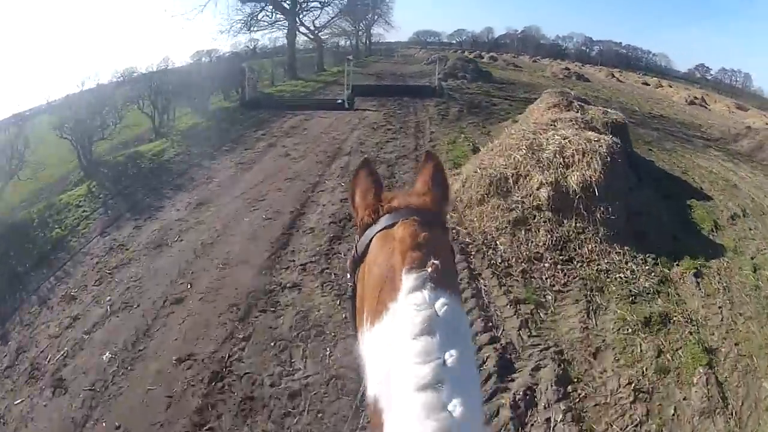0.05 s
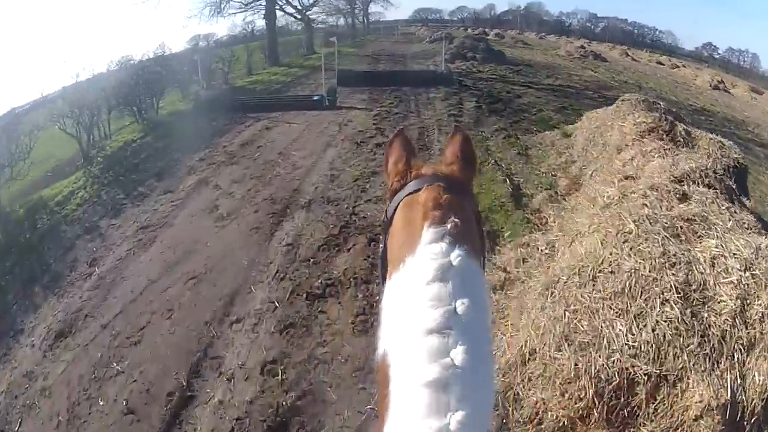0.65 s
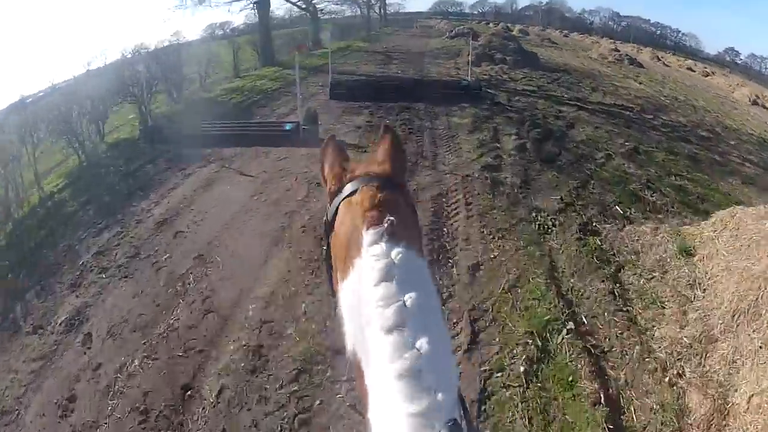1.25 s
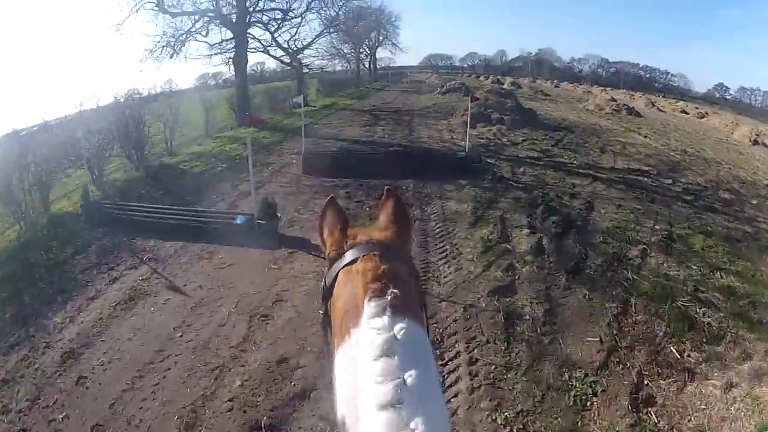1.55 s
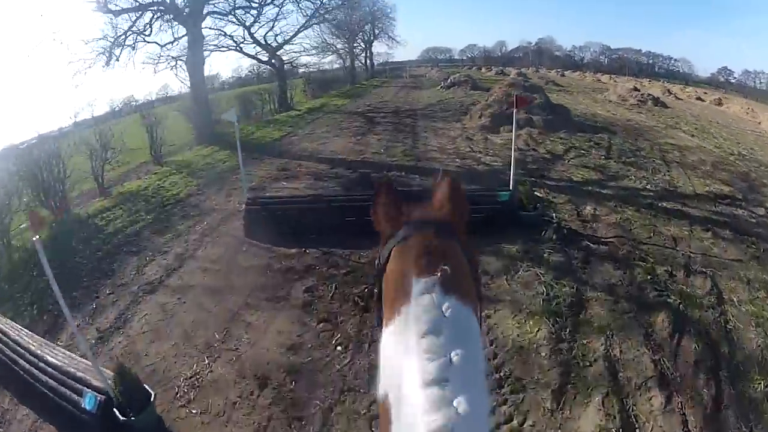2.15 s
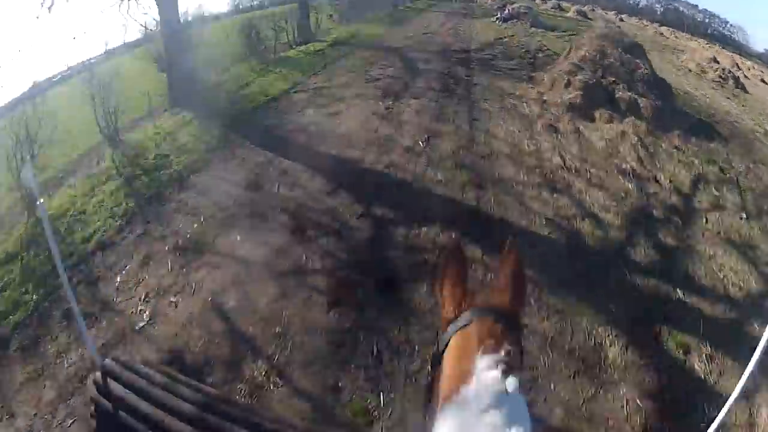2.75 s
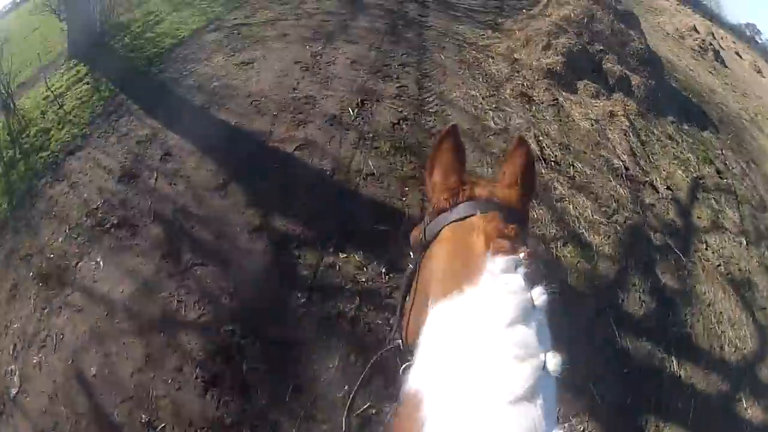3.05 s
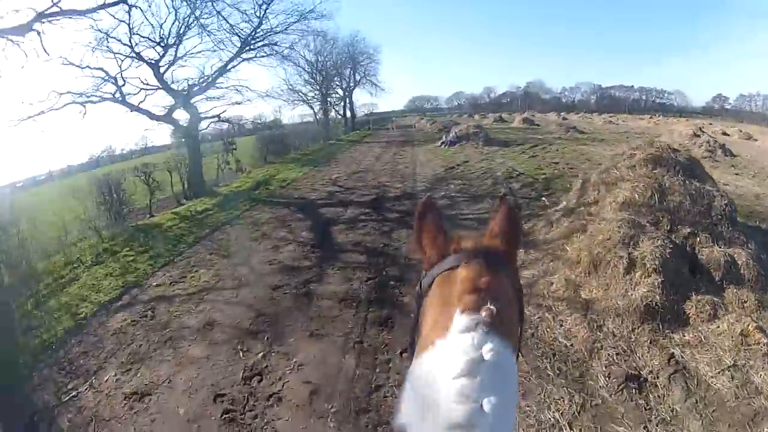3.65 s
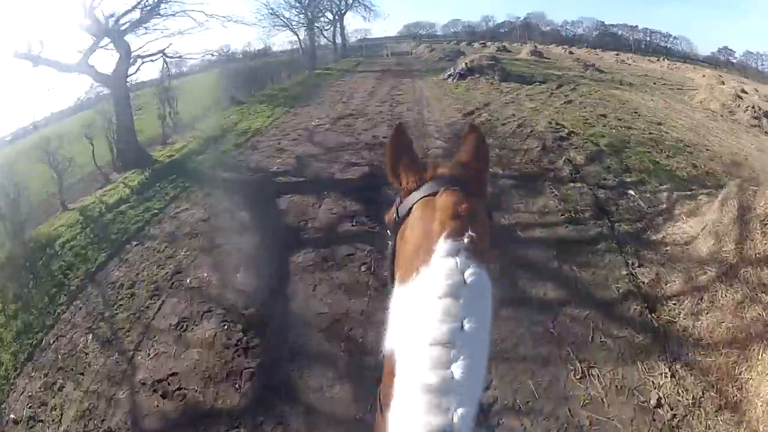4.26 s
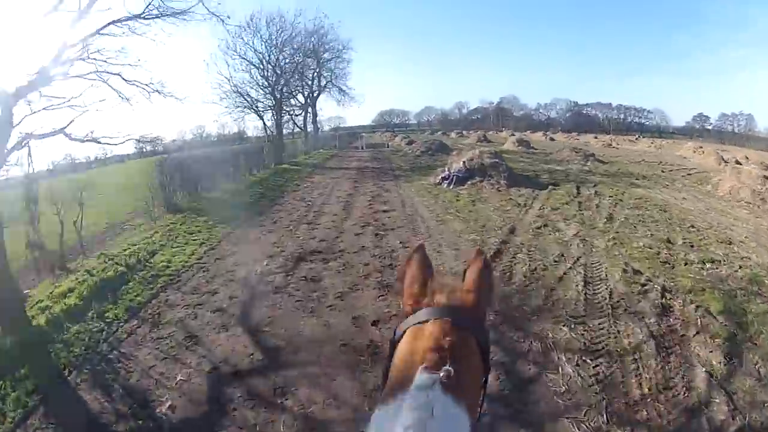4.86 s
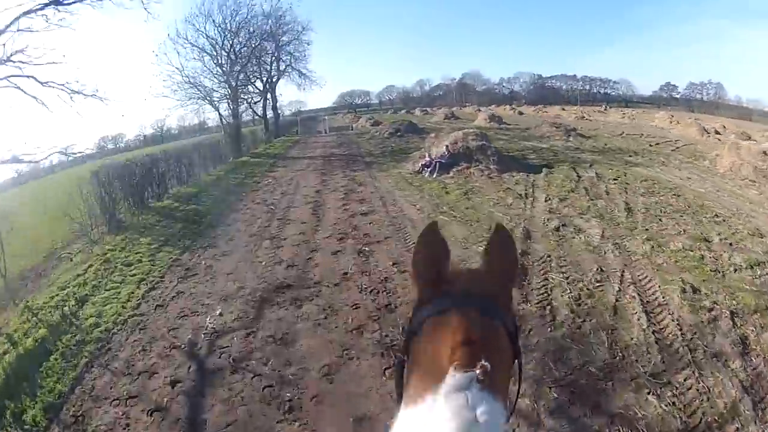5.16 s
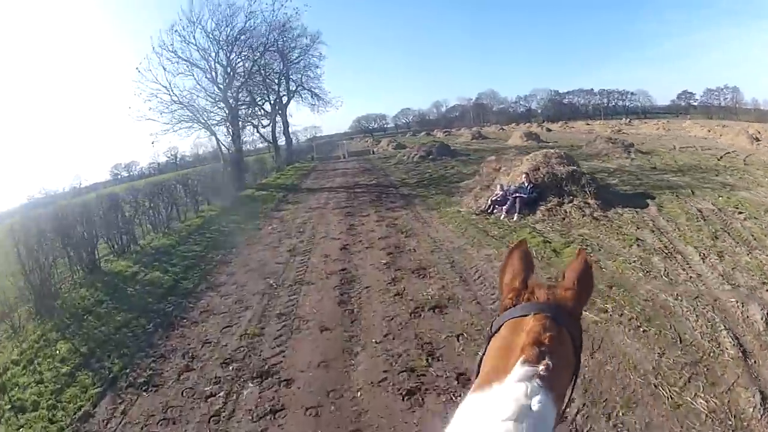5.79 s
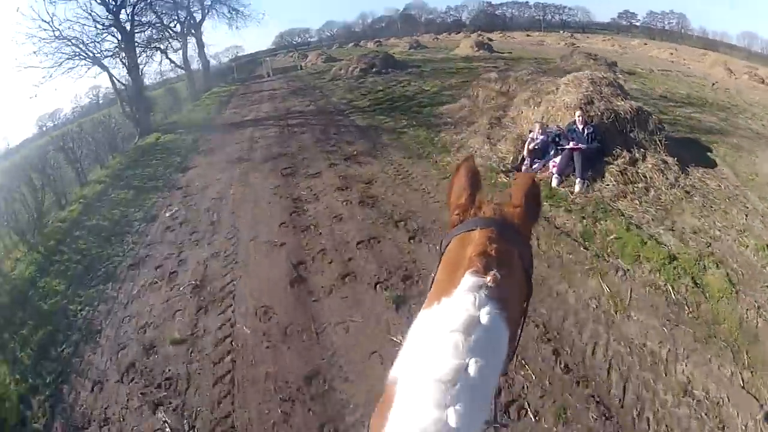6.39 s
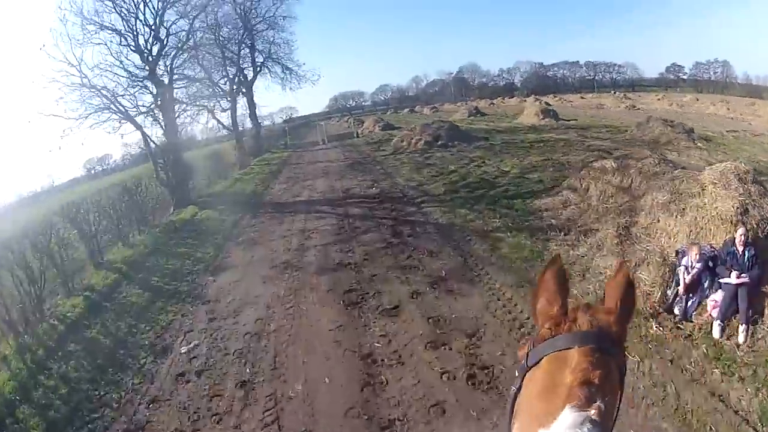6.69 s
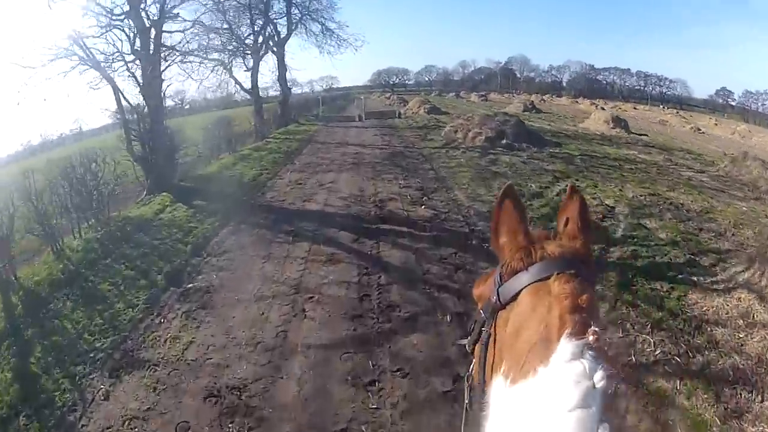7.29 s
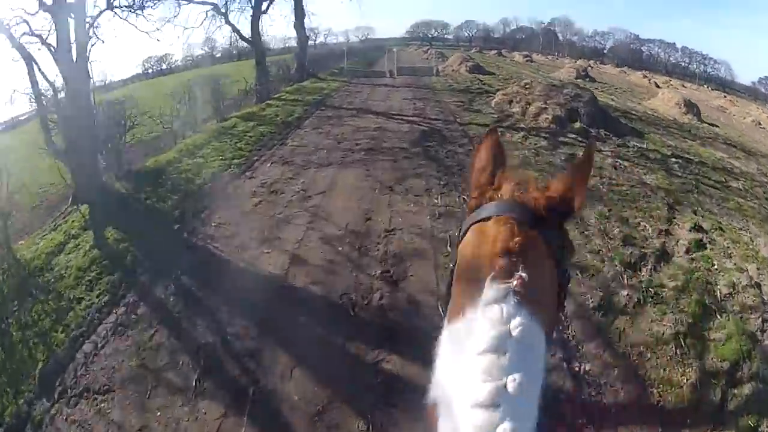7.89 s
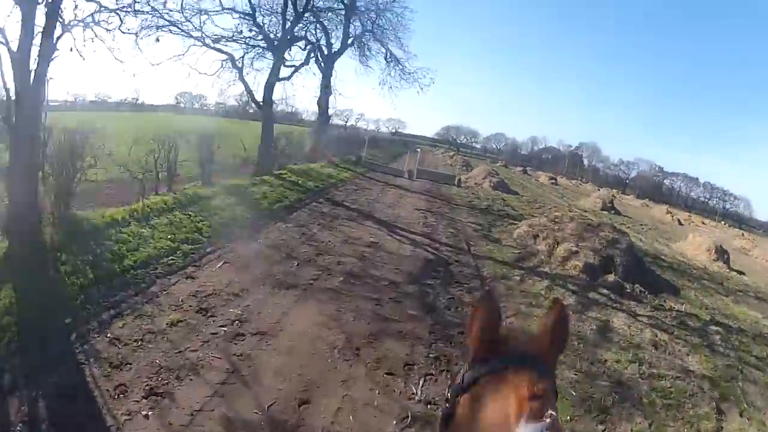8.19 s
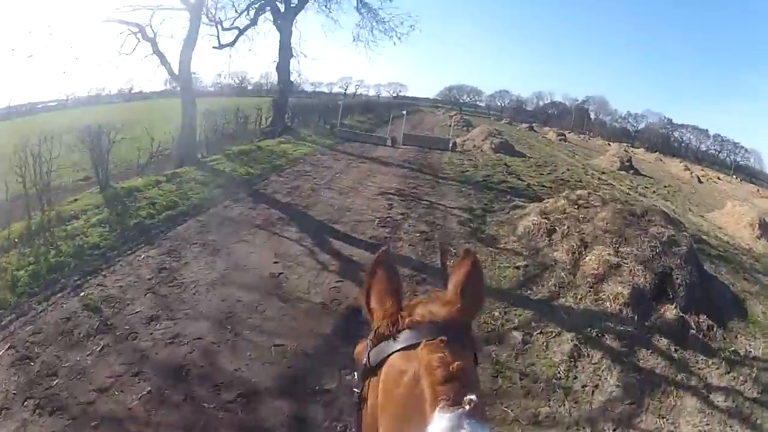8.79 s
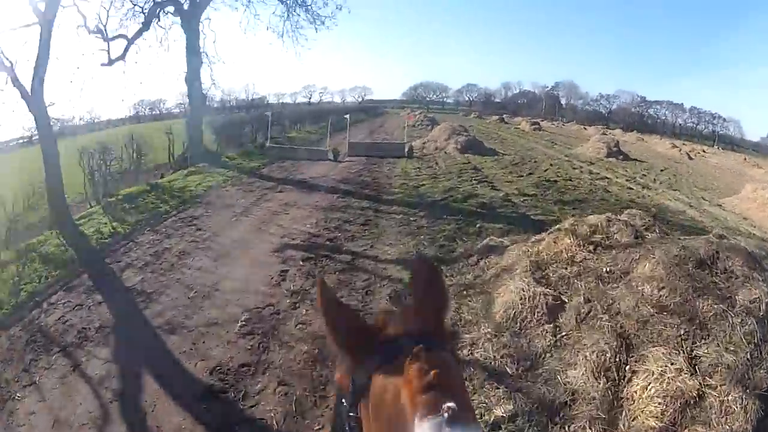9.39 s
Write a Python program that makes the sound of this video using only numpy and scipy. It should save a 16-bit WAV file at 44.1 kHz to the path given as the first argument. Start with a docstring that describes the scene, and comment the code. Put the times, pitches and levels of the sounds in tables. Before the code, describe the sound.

A horse canters on a dirt track, heard through a cased camera on the rider's helmet. Deep, muffled hoof thuds come roughly twice a second, with lighter footfalls between. Wind rumbles on the case throughout and hisses in surges with each stride. The camera knocks hollowly in its mount from about 1 second, and tack jingles faintly now and then. Between 2.8 and 3 seconds the horse jumps: the heaviest thuds arrive with a quick cluster of knocks, scrapes, tiny plastic squeaks and grit ticks. The hiss dips briefly, then the canter carries on. From about 4 seconds the knocks come more regularly, and the wind surges are stronger from around 5 seconds. A hard knock lands near 5.9 seconds and a sharp tick of grit near 6.5. Thuds, knocks and wind continue until the end at about 9.4 seconds, all boxy with a thin, glassy treble.

```python
"""A horse canters along a dirt track and jumps a low fence, its hoof blows coming up through the rider
as deep thuds in a cased camera on the helmet. The camera knocks and squeaks in its mount and scrapes
at the jump; tack jingles and flung grit ticks on the case. Wind buffets the case and hisses in surges
with the stride. The recorder's coarse sampling adds a glassy top."""
import sys
import numpy as np
from scipy import signal
from scipy.fft import rfft, irfft
from scipy.io import wavfile
from scipy.ndimage import uniform_filter1d

SR = 44100
rng = np.random.default_rng(int(sys.argv[2]) if len(sys.argv) > 2 else 0)


def wav_record(signal):
    """Record a signal, one row per channel, as 16-bit PCM in the file named by sys.argv[1]."""
    frames = np.transpose(np.atleast_2d(signal))
    bounded = np.clip(frames, -1, 1)
    # unit amplitude maps onto the largest positive 16-bit level
    quanta = np.round(bounded * 32767).astype(np.int16)
    wavfile.write(sys.argv[1], SR, quanta)


N = 416290
TIME = np.arange(N) / SR

# heavy hoof blows felt through the rider: start_s, level_db
HEAVY_BLOWS = [(0.753, -21), (1.295, -22.5), (1.742, -14), (1.954, -23.5), (2.253, -27), (2.83, -7),
               (2.913, -11), (2.984, -13), (3.445, -22), (3.749, -16), (4.255, -20.5), (4.346, -17),
               (4.448, -20), (4.883, -21.5), (5.354, -18), (5.883, -20.5), (6.462, -13.5), (6.973, -25.5),
               (7.501, -23), (7.985, -18), (8.117, -17.5), (8.214, -27), (8.576, -22), (9.098, -19),
               (9.167, -17.5)]
# each stride swings the rider forward into the air: crest_s, hold_s, hiss_db, sizzle_vs_hiss_db
STRIDES = [(0.038, 0.057, -50, -17.5), (0.495, 0.27, -55.5, -26.5), (1.182, 0.029, -52.5, -19.5),
           (1.666, 0.033, -49.5, -22), (2.145, 0.05, -52.5, -25), (2.68, 0.21, -48, -21),
           (3.166, 0.04, -64.5, -16), (3.496, 0.22, -58.5, -22), (4.155, 0.036, -48.5, -23),
           (4.691, 0.14, -47.5, -29), (5.246, 0.12, -42.5, -29), (5.745, 0.089, -43.5, -21),
           (6.234, 0.18, -46, -25.5), (6.836, 0.064, -44.5, -26), (7.288, 0.13, -48.5, -27),
           (7.768, 0.12, -58, -29), (8.304, 0.14, -48, -15.5), (8.82, 0.17, -45, -16.5),
           (9.363, 0.09, -47, -16.5)]
# the case's ring under light, sharp contacts: pitch_hz, level_db, t60_s
CASE_MODES = [(505, -30, 0.015), (670, -5, 0.038), (1134, 4, 0.02), (1770, 4.5, 0.021), (2220, 8, 0.0074),
              (2830, -5.5, 0.02), (3400, 0.5, 0.012), (3690, -7.5, 0.044), (5200, 4.5, 0.008)]


def undb(db):
    """Decibels to gain."""
    return 10 ** (np.asarray(db) / 20)


def unit(x):
    """Scale to rms 1."""
    return x / np.sqrt(np.mean(x ** 2))


def add(out, start_s, sound):
    """Mix a sound in at start_s."""
    i = max(int(start_s * SR), 0)
    out[i:i + len(sound)] += sound[:N - i]


def shaped_noise(spectrum):
    """Noise through an EQ curve of (hz, db) points, rolled off past both ends; rms 1."""
    hz, db = np.transpose(spectrum)
    bins_hz = np.maximum(np.fft.rfftfreq(N, 1 / SR), 1)
    rolloff = np.minimum(bins_hz / hz[0], 1) ** 2 * np.minimum(hz[-1] / bins_hz, 1) ** 2
    curve = undb(np.interp(np.log(bins_hz), np.log(hz), db))
    return unit(irfft(rfft(rng.standard_normal(N)) * rolloff * curve, N))


def wander(rate_hz):
    """Random steps, smoothed twice into a drift; rms 1."""
    step = max(int(SR / rate_hz), 1)
    held = np.repeat(rng.standard_normal(N // step + 1), step)
    return unit(uniform_filter1d(uniform_filter1d(held, step), step)[:N])


def grains(per_s, spread_db=3):
    """Random tiny contacts of uneven size; rms 1."""
    contacts = (rng.random(N) < per_s / SR) * rng.standard_normal(N)
    return unit(contacts * undb(spread_db * rng.standard_normal(N)))


def ring(modes, pitch=1, mode_ratio=1):
    """Struck, damped modes; a negative mode_ratio swings neighbours opposite ways, so the sound builds."""
    t = TIME[:SR // 8]
    return sum(mode_ratio ** k * undb(db) * np.sin(2 * np.pi * hz * pitch * t) * undb(-60 * t / t60_s)
               for k, (hz, db, t60_s) in enumerate(modes))


def resonate(contacts, modes):
    """Play contacts through a ringing body of unit energy."""
    body = ring(modes)
    return signal.fftconvolve(contacts, body / np.linalg.norm(body))[:N]


def airflow_db(rise_db_per_s=50.5, fall_db_per_s=116, lull_db=3, lull_after_s=0.084, lull_s=0.08):
    """Headwind that lulls as heavy blows check the rider, plus surges that collapse as the horse lands."""
    # steady airflow, following the horse's pace: time_s, hiss_db
    headwind = [(0, -58.5), (1.9, -60), (2.4, -64.5), (3.2, -63), (3.9, -65), (4.5, -56.5), (5, -58.5),
                (7.5, -51), (8.6, -55), (9.44, -55.5)]
    power = undb(np.interp(TIME, *np.transpose(headwind))) ** 2
    for start_s, _ in HEAVY_BLOWS:
        lull = np.exp(-((TIME - start_s - lull_after_s) / lull_s) ** 2)
        power *= undb(-lull_db * lull) ** 2
    for crest_s, hold_s, hiss_db, _ in STRIDES:
        before_db = rise_db_per_s * np.maximum(crest_s - TIME, 0)
        after_db = fall_db_per_s * np.maximum(TIME - crest_s - hold_s, 0)
        power += undb(hiss_db - before_db - after_db) ** 2
    return 10 * np.log10(power)


def wind(eddy_db=2.5, flutter_db=1.87):
    """Eddies buffet the case; in faster air the rush grows slowly, the hiss more, and a seam whistles."""
    # EQ curves of the five layers, low to high: frequency_hz, level_db
    buffet = [(15, 12), (30, 4), (70, 0.5), (120, -1), (170, 0), (260, -8.5), (380, -12.5), (500, -23),
              (700, -27.5)]
    rush = [(350, 3.5), (520, -3.5), (650, 1), (820, -1.5), (950, 2.5), (1130, -1.5), (1450, -2.5),
            (1900, -3), (2700, -22), (3700, -17.5), (4200, -22)]
    hiss = [(900, -38), (1130, 6.5), (1450, -5), (1800, 3.5), (2250, -1.5), (2600, -2.5), (3000, -8),
            (3750, -18.5), (4200, -49)]
    whistle = [(1600, -38), (1950, -4.5), (2150, -2.5), (2450, -0.5), (2700, -5.5), (3000, -44)]
    sizzle = [(3000, 10.5), (3800, 9), (4300, -2), (5200, 6), (6000, -11)]  # air on an edge of the case
    # turbulence round the helmet: time_s, level_db
    turbulence = [(0, -43), (2.35, -41.5), (2.7, -38.5), (3.05, -44), (3.75, -41), (4.2, -37.5), (4.6, -38),
                  (4.95, -42), (5.3, -42.5), (5.75, -38), (7.6, -38.5), (9.44, -42.5)]
    crest_s, hold_s, _, sizzle_vs_hiss_db = np.transpose(STRIDES)
    edge_db = np.interp(TIME, crest_s + hold_s / 2, sizzle_vs_hiss_db)
    turbulence_db = np.interp(TIME, *np.transpose(turbulence))
    air_db = airflow_db()
    surge_db = air_db - air_db.mean()
    layers = [(buffet, turbulence_db + 4.5 + 0.075 * surge_db + eddy_db * wander(rate_hz=45)),
              (rush, -51 + 0.61 * surge_db + flutter_db * wander(rate_hz=60)),
              (hiss, air_db - 1.05 + flutter_db * wander(rate_hz=70)),
              (whistle, -57 + 1.45 * surge_db + flutter_db * wander(rate_hz=50)),
              (sizzle, air_db + edge_db + 8.5)]
    return sum(shaped_noise(spectrum) * undb(level_db) for spectrum, level_db in layers)


def tack_jingles(gain_db=3, settle_s=0.053):
    """Buckles and bit chatter after a jolt and settle."""
    # jolts to the tack: start_s, level_db
    jolts = [(1.289, -57), (1.76, -57), (3.92, -62), (4.15, -62), (4.33, -52.5), (4.37, -69.5),
             (4.868, -54.5), (5.48, -56), (6.491, -52), (8.03, -55), (8.62, -53)]
    # ring of the metal: pitch_hz, level_db, t60_s
    metal_modes = [(1710, 3.5, 0.055), (1990, 6.5, 0.028), (3175, -0.5, .05), (3440, -10, 0.075),
                   (3560, -3, 0.067), (3720, -3, 0.05), (3870, -7, .04)]
    shake = np.zeros(N)
    for start_s, level_db in jolts:
        add(shake, start_s, undb(level_db + gain_db) * np.exp(-TIME[:SR // 2] / settle_s))
    return resonate(shake * grains(per_s=500), metal_modes)


def flung_grit(gain_db=7, decay_s=0.00039):
    """A crumb of earth bursts on the shell with a bright tick and sets the case ringing."""
    # direct hits on the case: start_s, level_db
    hits = [(2.8344, -35), (2.8868, -41), (2.8954, -30), (3.695, -41), (4.148, -49), (4.225, -57),
            (4.405, -45), (4.7074, -49), (6.4478, -31), (6.4562, -20.5), (7.039, -43.5), (8.123, -34)]
    ticks, t = np.zeros(N), TIME[:SR // 50]
    for start_s, level_db in hits:
        burst = np.exp(-t / decay_s) * rng.standard_normal(len(t))
        add(ticks, start_s, undb(level_db + gain_db) * burst)
    return ticks + resonate(ticks, CASE_MODES)


def mount_squeaks(width_s=0.0022, waver=0.15):
    """Plastic slips on plastic for a few rough cycles."""
    # slips at the far end of a hard sway: peak_s, pitch_hz, level_db
    slips = [(1.922, 1950, -36.5), (2.789, 1900, -30.5), (2.851, 2000, -17), (2.999, 1855, -29),
             (8.04, 1930, -33), (8.112, 1900, -33.5), (8.642, 1950, -30.5)]
    out = np.zeros(N)
    for peak_s, pitch_hz, level_db in slips:
        phase = 2 * np.pi * np.cumsum(pitch_hz * (1 + waver * wander(rate_hz=1500))) / SR
        envelope = np.exp(-((TIME - peak_s) / width_s) ** 2)
        out += undb(level_db) * envelope * np.sin(phase)
    return out


def case_rattles(scrape_gain_db=2, patter_db=-58.5, patter_growth=0.47):
    """Dense stick-slip grains, and a patter of loose gear that swells with each stride, ring the case."""
    # the case scrapes and tack rattles: start_s, length_s, level_db
    scrapes = [(1.29, 0.015, -48), (1.767, 0.01, -53.5), (1.898, 0.013, -44), (2.792, 0.025, -34),
               (2.84, 0.029, -34), (2.873, 0.031, -24.5), (2.901, 0.022, -38), (3.048, 0.012, -54),
               (3.442, 0.01, -47.5), (3.701, 0.057, -47.5), (4.147, 0.014, -44), (4.221, 0.0074, -43),
               (4.322, 0.029, -42), (4.366, 0.041, -50), (4.708, 0.0084, -42), (5.853, 0.0075, -41),
               (6.449, 0.02, -34.5)]
    pressure, air_db = np.zeros(N), airflow_db()
    for start_s, length_s, level_db in scrapes:
        add(pressure, start_s, np.full(int(length_s * SR), undb(level_db + scrape_gain_db)))
    slips = grains(per_s=4000) * uniform_filter1d(pressure, SR // 300)
    patter = grains(per_s=130) * undb(patter_db + patter_growth * (air_db - air_db.mean()))
    return resonate(slips + patter, CASE_MODES)


def camera_knocks(lag_s=0.0014, contact_s=0.00011, detune=0.025):
    """Shell and plate ring first, a little differently each time; then the softer mount thumps."""
    # the camera hits its mount; the rows at 2.939 and 2.947 s are the deep thud of the landing after the jump:
    # start_s, thump_db, shell_db, plate_db, mount_pitch_ratio
    knocks = [(0.64, -39, -39, -47, 0.57), (1.019, -15, -24, -28, 0.83), (1.265, -16.5, -44.5, -35, 0.78),
              (1.535, -12.5, -23.5, -26, 1.01), (2.818, -15, -53, -40, 0.71), (2.834, -15, -39, -25, 0.93),
              (2.878, -22, -20.5, -39, 1.03), (2.896, -14, -44, -41, 0.82), (2.919, -10.5, -54, -41, 0.5),
              (2.939, -14, -58, -59, 0.52), (2.947, -10, -57, -57, 0.38), (2.995, -43, -58, -31.5, 0.88),
              (3.289, -37, -47, -44, 1.14), (3.99, -14.5, -31.5, -37.5, 0.85), (4.111, -13, -34, -39, 0.61),
              (4.311, -10, -26.5, -30, .6), (4.533, -16.5, -21.5, -21.5, 0.92),
              (4.778, -30.5, -41, -51, 0.89), (5.045, -11.5, -22.5, -19, 0.87),
              (5.084, -21.5, -58, -55, 0.78), (5.401, -21, -32, -27, 1.13), (5.6, -11.5, -23, -20.5, 0.86),
              (5.788, -16, -27, -38, 1.35), (5.859, -30, -34, -30, 1.1), (5.912, -5.5, -27, -19.5, 0.66),
              (6.132, -13, -24, -23, 0.87), (6.448, -14, -22, -27.5, 0.88), (6.456, -17.5, -29, -24.5, .96),
              (6.676, -16, -28.5, -28.5, 0.81), (6.812, -21.5, -36, -42, 1.03),
              (7.689, -9.5, -25, -22.5, 0.82), (8.013, -11, -31, -25.5, 0.66),
              (8.252, -21, -31, -31.5, 1.15), (8.562, -11.5, -26.5, -24.5, 0.68),
              (9.06, -22.5, -42, -37, 0.97), (9.334, -20.5, -43, -56, 0.74)]
    # ring of the mount, the hollow shell and the front plate: pitch_hz, level_db, t60_s
    mount_modes = [(85.2, -6, 0.082), (198.6, 2, 0.019), (338, -3, 0.016)]
    shell_modes = [(424, -3.5, 0.028), (664, 1, 0.02)]
    plate_modes = [(885, -9.5, 0.035), (1127, 0, 0.029), (1720, -13.5, 0.017), (2360, -18, 0.022),
                   (3750, -15.5, 0.023)]
    out = np.zeros(N)
    for start_s, thump_db, shell_db, plate_db, mount_pitch in knocks:
        shell_pitch, plate_pitch = 1 + detune * rng.standard_normal(2)
        add(out, start_s, undb(shell_db + 6) * ring(shell_modes, shell_pitch, mode_ratio=-1.08))
        add(out, start_s, -undb(plate_db + 5) * ring(plate_modes, plate_pitch, mode_ratio=-0.95))
        add(out, start_s + lag_s, undb(thump_db + 3.5) * ring(mount_modes, mount_pitch, mode_ratio=-1.07))
    push = np.exp(-TIME[:SR // 200] / contact_s)  # rounds off the attack
    return signal.fftconvolve(out, push / push.sum())[:N]


def light_hoofbeats(level_db=-34, spread_db=4, after_s=0.06, beat_s=0.14):
    """Two lighter footfalls after each stride's surge: start_s, level_db."""
    beats = [(crest_s + hold_s + after_s + k * beat_s, level_db + spread_db * rng.standard_normal())
             for crest_s, hold_s, _, _ in STRIDES for k in range(2)]
    return [(start_s, db) for start_s, db in beats if start_s < TIME[-1]]


def hooves(gain_db=-1, sway_hz=31.8, rise_s=0.02, detune=0.174, earth_db=-16, earth_hz=130, earth_s=0.023):
    """Each blow sets rider and helmet swaying for a few cycles, with a dull crunch of packed earth."""
    out, t = np.zeros(N), TIME[:SR // 3]
    swell = t / rise_s * np.exp(1 - t / rise_s)
    dull = signal.butter(2, earth_hz, fs=SR, output="sos")
    for start_s, level_db in HEAVY_BLOWS + light_hoofbeats():
        noise = rng.standard_normal(len(t))
        crunch = unit(signal.sosfilt(dull, noise)) * np.exp(-t / earth_s)
        pitch_hz = sway_hz * np.exp(detune * noise[-1])
        sway = swell * np.sin(2 * np.pi * pitch_hz * t)
        add(out, start_s, undb(level_db + gain_db) * (sway + undb(earth_db) * crunch))
    return out


def scene(leak_db=-17, wall_hz=4250):
    """Blows and rattles are muffled by the closed case; wind and grit play on its outside."""
    wall = signal.butter(10, wall_hz, fs=SR, output="sos")
    contacts = hooves() + camera_knocks() + case_rattles() + tack_jingles() + mount_squeaks()
    muffled = signal.sosfiltfilt(wall, contacts)
    treble_leak = undb(leak_db) * (contacts - muffled)
    return (muffled + treble_leak + wind() + flung_grit())[None]


def record(dry):
    """The recorder holds coarse samples, mirroring the sound into a glassy treble, then cuts the top."""
    hold_hz, top_hz = 12000, 15600
    coarse = signal.resample_poly(dry, hold_hz, SR, axis=1, window=("kaiser", 8))
    steps = np.repeat(coarse, 4, axis=1)
    held = signal.resample_poly(steps, SR, 4 * hold_hz, axis=1)[:, :N]
    top_cut = signal.ellip(10, 0.2, 70, top_hz, fs=SR, output="sos")
    return signal.sosfilt(top_cut, held)


dry = scene()
out = record(dry)
wav_record(out)
```